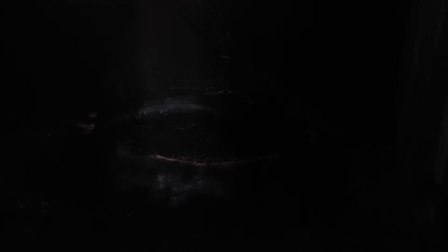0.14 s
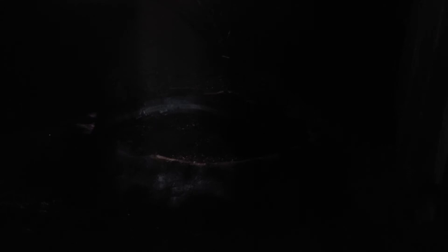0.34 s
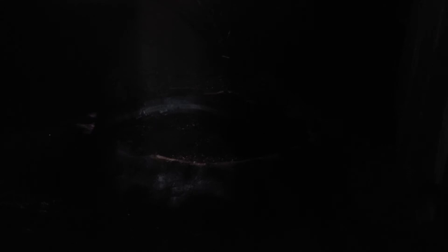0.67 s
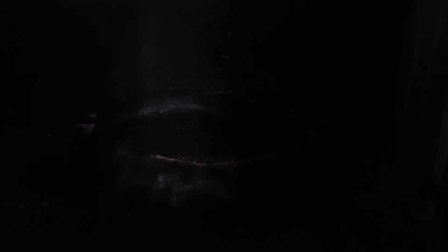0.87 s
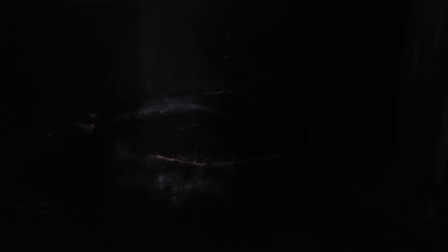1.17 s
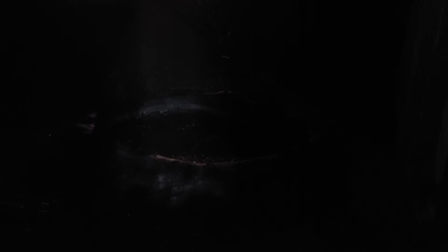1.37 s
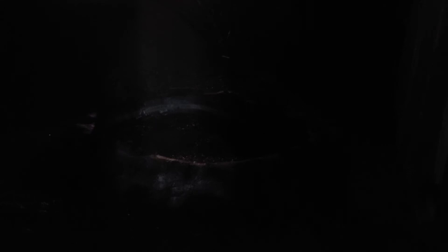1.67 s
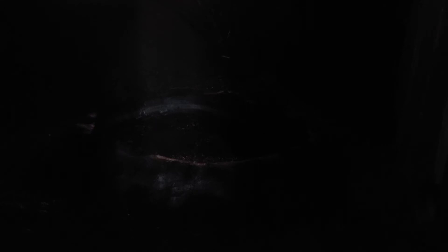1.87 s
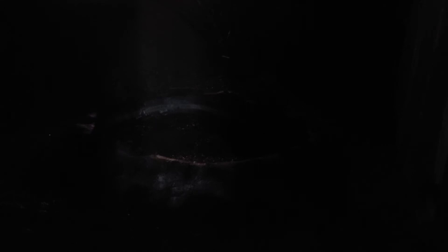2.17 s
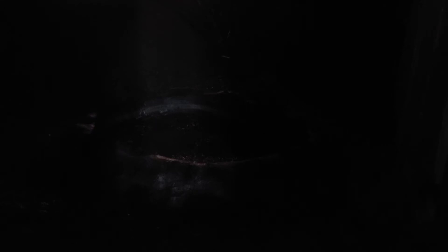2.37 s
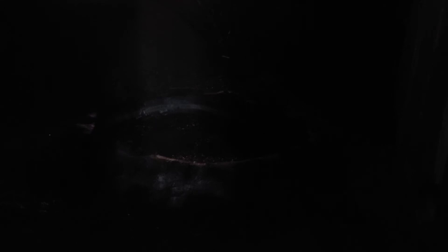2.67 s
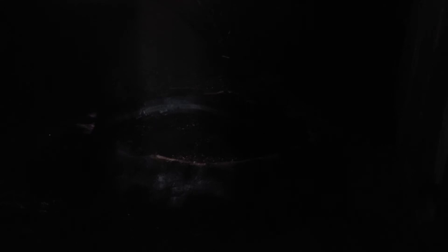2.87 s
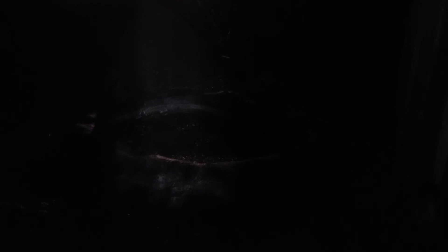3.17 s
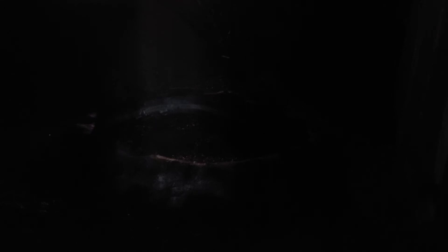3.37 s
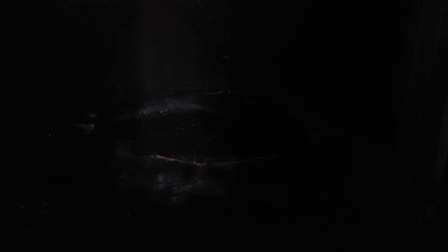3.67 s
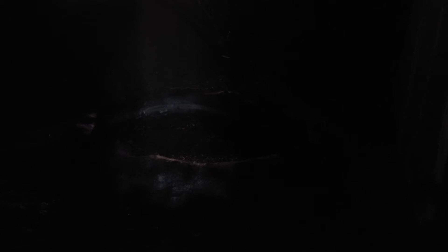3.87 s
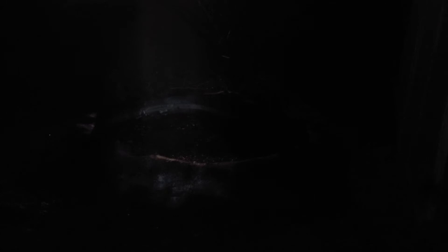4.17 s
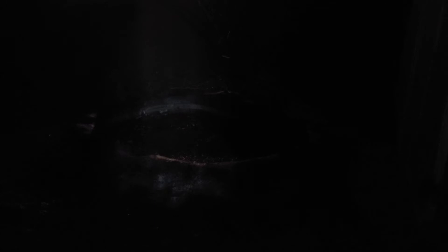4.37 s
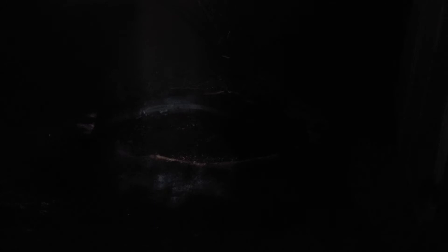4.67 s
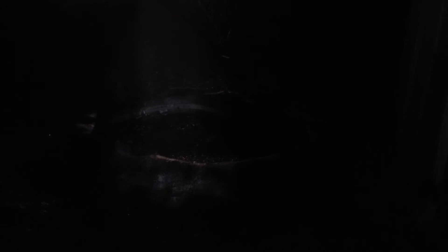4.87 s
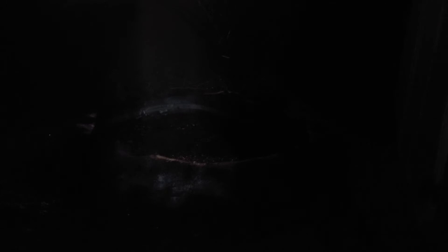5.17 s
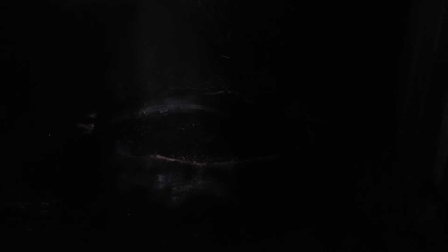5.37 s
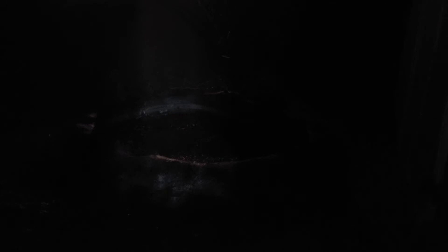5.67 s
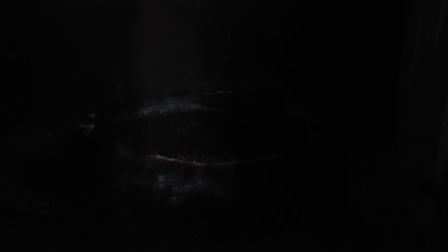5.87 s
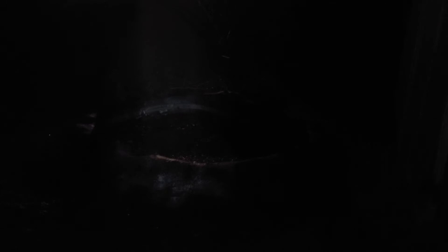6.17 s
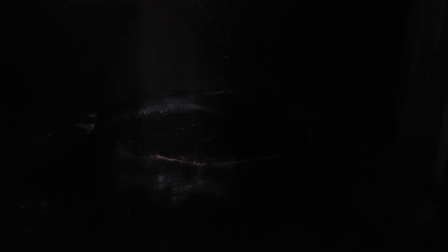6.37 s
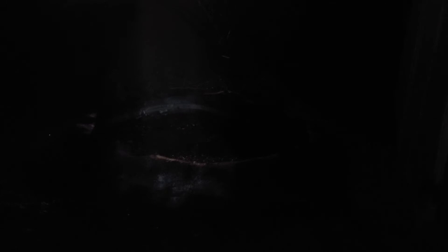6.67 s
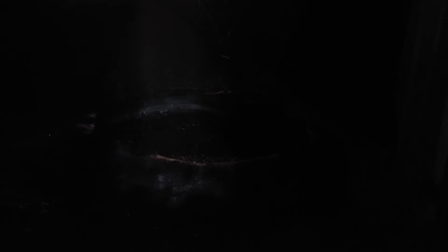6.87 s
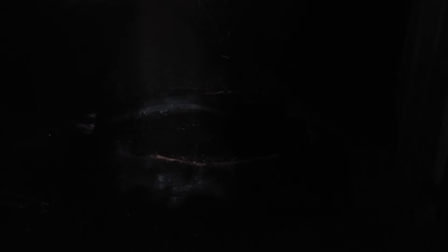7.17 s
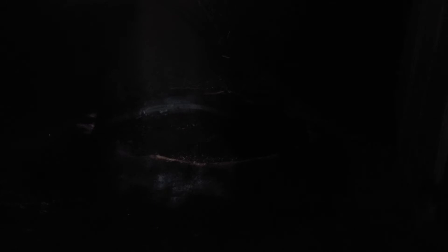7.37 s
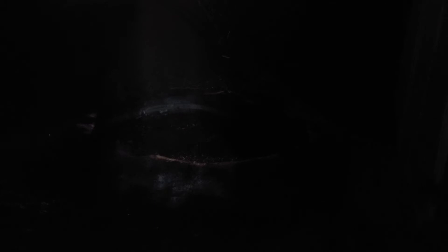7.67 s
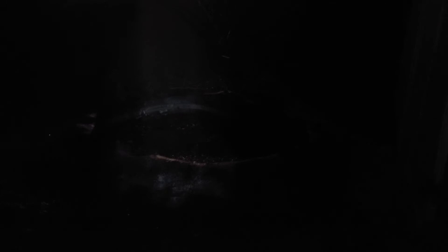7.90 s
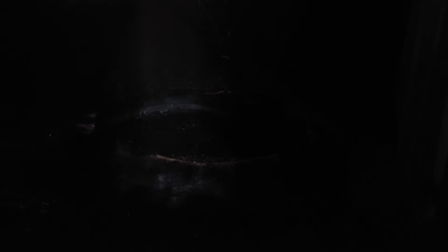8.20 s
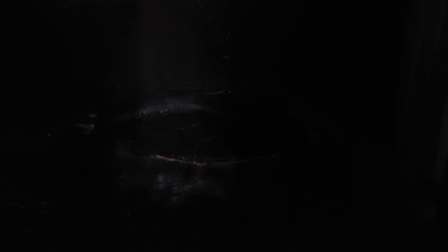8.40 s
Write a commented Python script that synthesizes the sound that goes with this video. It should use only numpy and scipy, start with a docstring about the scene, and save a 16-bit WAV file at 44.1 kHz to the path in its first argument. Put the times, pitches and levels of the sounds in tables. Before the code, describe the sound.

Quick bursts of low, almost pure frog croaks come seconds apart, between them only soft rain hiss, leaf drips and a faint low hum.

```python
"""Frog calling at night, close by

A close frog calls in short runs of arched, nearly pure notes, with thin squeaks leading in: gliding partials plus air.
A steady hiss, as of fine rain, is coloured noise with a hump near 1 kHz; a low sine hum wavers underneath.
Drops tick and spatter on leaves (short rings, then noise) over a faint patter of smeared clicks.
Soft thuds are dull noise bursts now and then; a few thin snaps are very short bright ones.
"""
import sys
import numpy as np
from scipy import signal
from scipy.fft import rfft, irfft
from scipy.io import wavfile

SR = 44100
rng = np.random.default_rng(int(sys.argv[2]) if len(sys.argv) > 2 else 0)


def to_wav(sig):
    """Store sig (one row per channel, or 1-D mono) as 16-bit WAV at the path in sys.argv[1].

    Samples outside -1..1 are clipped; the rate is SR.
    """
    pcm = np.clip(np.atleast_2d(sig), -1, 1) * 32767
    pcm = np.round(pcm).astype(np.int16)
    wavfile.write(sys.argv[1], SR, pcm.T)  # frames by channels


N = 376613

# frog notes: start_s, length_s, opening_hz, held_hz, closing_hz (both ends glide; all sag), glide_in_s, glide_out_s,
# first_db, second_db, third_db, fourth_db, upper_db (partial levels before swings and flutter),
# throat_hz (upper resonance), first_peak_at, second_peak_at, rest_peak_at (share of length, 0-1),
# pointedness (power of the swell), skirt_db (throat skirt), sag_per_s (share of pitch lost per s)
FROG_NOTES = [ (0.0, 0.1, 1124, 599, 594, 0.074, 0.018, -38, -42.5, -63, -82, -78, 3600, 0, 0.45, 0.3, 1.83, -15, .05),
              (3.048, 0.12, 1225, 797, 1020, 0.057, 0.066, -43.5, -58, -80, -77, -88, 3400, 0.55, .45, 0.3, 2.2, -15, .05),
              (3.184, 0.076, 517, 595, 524, 0.042, 0.047, -43, -37, -50.5, -62, -62, 3250, 0.99, 0.95, 0.65, 0.84, 0, 0.2),
              (3.3, 0.099, 529, 586.7, 500, 0.027, 0.042, -36.5, -24, -44, -57, -64, 3750, 0.74, 0.49, 0.5, 1.13, -16, 0.29),
              (3.438, 0.091, 536, 594, 502, 0.048, 0.035, -36, -21, -45, -53.5, -56, 3980, 0.73, 0.55, 0.13, 1.7, -17, 0.39),
              (3.566, 0.11, 564, 610.4, 522, .025, 0.054, -34.5, -21.5, -44, -51.5, -54.5, 3940, 0.47, 0.41, 0.19, 1.16, 4.5, 0.38),
              (3.686, 0.13, 540, 624.4, 513, .035, 0.036, -36.5, -29, -43, -50.5, -53, 3460, 0.66, 0.46, 0.37, 0.7, -13, 0.45),
              (5.509, 0.048, 486, 579, 480, .024, 0.025, -66, -45, -58, -63, -62.5, 3830, 0.96, 1, 1, 0.37, -5, .1),
              (5.614, 0.089, 532, 636.6, 464, 0.0198, 0.0343, -38.5, -32.5, -44.5, -66, -54, 3720, 0.62, 0.5, 0.09, 0.74, -3, 0.23),
              (5.748, 0.1, 555, 686, 531, 0.024, 0.054, -35, -29.5, -40.5, -53.5, -55, 4670, 0.58, 0.38, 0.11, 1.38, -16, 0.76),
              (5.827, 0.036, 450, 431, 410, 0.012, .015, -73, -41.5, -43, -60.5, -71, 4000, .5, 0.4, 0.6, 1.3, -20, .1),
              (5.868, 0.027, 470, 464, 470, .01, .015, -72, -32.5, -55, -58, -59, 3980, .5, 0.8, 1, 0.88, -22, .1),
              (5.891, 0.093, 510, 675, 470, 0.0263, 0.039, -35, -29, -41, -56.5, -52, 3980, 0.61, 0.36, 0.4, 1.6, -23, 0.51),
              (5.974, 0.029, 472, 459, 414, .01, 0.015, -67, -33.5, -49, -51, -60, 3620, .5, 0.72, 0.6, 1.1, -21, .1),
              (7.494, 0.13, 849, 573, 773, 0.065, 0.0465, -47, -56, -71, -78, -90, 3500, 0.82, .6, 1, 1.14, -15, 0.037),
              (7.615, 0.11, 476, 525, 497, 0.035, 0.059, -30.5, -34.5, -40, -60, -61.5, 3120, 0.55, 0.42, 0.42, 1.47, -20, .1),
              (7.742, 0.12, 455, 542.2, 442, 0.029, 0.064, -29.5, -29, -37, -51, -49, 3760, .55, 0.26, 0.29, 1.5, -11, 0.13),
              (7.851, .135, 443.4, 605.5, 470, 0.058, .05, -27.5, -23.5, -38, -44.5, -42.5, 3340, 0.67, 0.72, 0.51, 2, -30, 0.62),
              (7.969, 0.15, 460, 644, 490, 0.061, 0.031, -33, -26.5, -50, -48, -42, 3080, 0.73, 0.67, 0.37, 1, -18, 0.512),
              ]
# brief dips and pops, one list each for first, second, third, fourth and upper partials:
# centre_s (scene time), change_db, half_width_s
PARTIAL_SWINGS = [
    [(.018, -10.5, 0.009), (.066, 28.5, 0.0068), (7.61, 3, 0.0089), (7.565, 7, .015), (.05, 15, 0.0079),
     (.058, -15, 0.00085), (3.055, 21, 0.0095), (3.15, -6, 0.018), (3.228, -21, 0.0028), (7.51, 8, 0.0063),
     (3.335, -13.5, 0.021), (3.48, -23, .012), (3.62, -8.5, 0.0081), (3.652, 16.5, 0.0048),
     (3.805, 6, .006), (7.955, -7, 0.012), (7.972, 22.5, .006), (8.08, -12, 0.011), (8.093, 9.5, 0.014)],
    [(.022, 6, 0.0033), (5.909, -2, 0.0044), (5.512, 8.5, 0.0039), (.033, -15, 0.0025), (.008, -19, 0.0098),
     (.068, -15, 0.012), (3.225, -26, 0.0019), (3.236, 9.5, 0.0047), (3.385, -8, 0.0098),
     (3.512, -10, 0.006), (3.58, 7, 0.0028), (3.768, 5.5, 0.016), (7.61, 16, .012), (7.86, 11.5, .01),
     (7.99, -4, 0.0077), (3.594, -13, 0.017), (3.645, -4, 0.0055), (3.652, 2.5, 0.0017),
     (3.71, 11.5, 0.0023), (3.724, -11.5, 0.011), (3.79, -18, 0.0059), (3.8, 10.5, 0.003),
     (5.808, -12, .006), (5.96, -14, 0.015), (5.972, 28, .006), (7.672, -17, 0.005), (7.73, 23, 0.015),
     (7.782, -14.5, 0.021), (7.89, 3, 0.0033), (7.903, -9, .008), (7.935, 5, 0.0069), (7.952, -28, 0.011),
     (7.963, 3.5, 0.0033), (8.075, -9, 0.0088), (8.089, 5.5, 0.0028), (8.098, 12, 0.0016)],
    [(3.62, 0, .012), (3.8, 3, 0.003), (5.656, -2, 0.0065), (5.825, 6.5, .012), (5.935, -27, 0.0068),
     (7.648, -14, .006), (7.684, -12, 0.0042), (7.79, -8, 0.0061), (7.845, 2, 0.0097), (7.948, -7, 0.013),
     (7.862, 9, 0.011), (7.905, 5, 0.01), (7.97, 9, 0.015), (7.988, 9.5, 0.0072), (8.042, -9, .012),
     (8.085, 14, 0.014)],
    [(3.595, 4, .01), (3.775, 11, 0.025), (5.776, 10.5, 0.0083), (7.66, 5, 0.0088), (7.8, 7.5, 0.01),
     (7.89, 7, .008)],
    [(3.48, 6, 0.0091), (3.572, 13, 0.011), (3.65, 16, 0.0055), (3.695, 9, 0.011), (3.722, 12, 0.017),
     (5.65, 9, 0.0034), (5.905, 3, 0.0088), (7.665, 13, 0.004), (7.985, -3, .012), (8.032, -10, 0.004),
     (8.056, -12, .005), (8.07, 6, 0.0053)],
]
# pointedness of the swell and of the fade, one power each for the same five voice parts
RISE_POWERS = [1.22, 0.99, 0.62, 0.8, 1]
FALL_POWERS = [3.54, 1.26, 0.55, 1.8, 1.1]
# noise bands that rise with the call, bright hiss, throaty and dull air: low_hz, high_hz (band() limits the edges)
BREATH_BANDS = [(4500, 22000), (2560, 3780), (423, 2420)]
# colour of the steady hiss, a hump near 1 kHz and a steep drop near 7 kHz: frequency_hz, relative_db
HISS_COLOUR = [(30, -43), (55, -1.5), (120, -5), (250, -14.5), (600, -16), (800, -9.5), (1050, -7.5),
               (1500, -13), (2000, -15), (4850, -20), (6700, -25.5), (7200, -35.5), (11500, -39),
               (15800, -39)]
# drops on leaves: start_s, level_db, spatter_hz (centre), spatter_t60_s, spatter_db (re level_db), tick_hz
LEAF_DROPS = [(0.3192, -56, 4100, 0.13, -2, 2920), (0.637, -48, 5230, 0.054, -12, 5040),
              (0.627, -40.5, 4970, 0.22, -17.5, 4840), (0.987, -48.5, 4700, 0.088, -11, 1440),
              (0.9967, -43, 5930, 0.1, -15, 5870), (1.268, -54, 6300, 0.053, -2, 1570),
              (1.308, -55, 5910, 0.17, -10, 2010), (1.8422, -52, 4180, 0.11, -21, 1990),
              (2.2094, -65, 4020, 0.11, -12, 1520), (2.366, -49, 4180, 0.16, -15, 1870),
              (2.4684, -53, 5670, 0.47, -11, 1550), (2.6288, -43.5, 3820, 0.091, -16, 3800),
              (2.853, -49.5, 3900, 0.085, -16, 1850), (2.9401, -47, 3850, 0.14, -22, 1600),
              (3.0695, -58, 4000, 0.34, -8, 1670), (3.391, -37, 5180, 0.21, -5, 5300),
              (4.409, -56, 5280, 0.19, -5, 1890), (4.5193, -51, 3960, 0.13, -10.5, 2020),
              (4.9386, -49, 3630, 0.21, -3.5, 2740), (6.2234, -41, 5470, 0.27, -12.5, 5900),
              (6.3865, -57, 3550, 0.13, -2, 3540), (6.8127, -54, 4670, 0.13, -10, 1660),
              (7.0185, -51, 5700, 0.11, -15, 5630), (7.3926, -42.5, 3330, 0.12, -12, 2400),
              (7.6046, -43, 4200, 0.69, -18.5, 1400), (8.2506, -34, 5140, 0.17, -18.5, 4970)]
# soft thuds: start_s, level_db (before a trim), t60_s (of the low part)
SOFT_THUDS = [(0.612, -63, 0.27), (1.122, -54.5, 0.42), (2.367, -46.5, 0.57), (4.939, -55.5, 0.48),
              (7.65, -50, 1)]
# thin bright snaps, as of small twigs: start_s, level_db (noise rms before decay), t60_s
TWIG_SNAPS = [(.9872, -53, .004), (3.3005, -57, .006), (3.308, -49.5, 0.027), (7.389, -57, 0.06)]

GLIDE_IN_POWER, GLIDE_OUT_POWER = 2.1, 1.744   # how sharply the glides curve into the held pitch
THROAT_WIDTH_HZ = 350
BREAK_DB = -18   # dull rasp that joins in while the pitch slides fast
POOL_T60_S, POOL_DB = .2, -17
HISS_DB = -58
HUM_HZ, HUM_DB = 59.4, -62
SPATTER_OCTAVES = 0.59   # either side of the centre
TICK_RISE_S = 0.00035
THUD_TOP_HZ = 265
CUTOFF_HZ = 15780


def amp(db):
    """Decibels to gain."""
    return 10 ** (np.asarray(db) / 20)


def rms_one(x):
    """Scales to unit rms."""
    return x / np.sqrt(np.mean(x ** 2) + 1e-20)


def band(x, low_hz, high_hz):
    """Band-pass, with edges held between 20 Hz and 0.45 of the sample rate."""
    edges = np.clip([low_hz, high_hz], 20, .45 * SR)
    return signal.sosfilt(signal.butter(2, edges, "band", fs=SR, output="sos"), x)


def drift(rate_hz, size=N):
    """Smooth random wander of unit rms, changing about rate_hz times a second."""
    r = np.exp(-2 * np.pi * rate_hz / SR)
    run_in = SR // 2
    noise = rng.standard_normal(size + run_in)
    return rms_one(signal.lfilter([1], [1, -2 * r, r * r], noise)[run_in:])


def add(out, start_s, sound):
    """Mixes a sound in at a time."""
    at = max(round(start_s * SR), 0)
    out[at:at + len(sound)] += sound[:N - at]


def swell(u, peak_at, rise, fall):
    """From nothing up to 1 at the peak and back, over u = 0..1."""
    peak_at = np.clip(peak_at, .005, .95)
    up = np.clip(u / peak_at, 0, 1)
    down = np.clip((1 - u) / (1 - peak_at), 0, 1)
    return np.sin(np.pi / 2 * up) ** rise * np.sin(np.pi / 2 * down) ** fall


def swing(time_s, rows):
    """Gain of the brief dips and pops of one voice part, each a bell curve in dB."""
    return amp(sum(db * np.exp(-((time_s - centre) / width) ** 2) for centre, db, width in rows))


def throat(high_hz, throat_hz, skirt_db):
    """Shares the upper level among partials: a resonance peak on a falling skirt, at constant total power."""
    share = amp(skirt_db) * 2300 / high_hz + 1 / (1 + (2 * (high_hz - throat_hz) / THROAT_WIDTH_HZ) ** 2)
    share = share / (1 + (high_hz / 4400) ** 16)
    return share / np.sqrt(np.sum(share ** 2, axis=0))


def note(row, waver, rasp, flutter, breath):
    """Partials on an arched pitch; the cords lose their steadiness while the pitch slides fast."""
    (start, length, opening_hz, held_hz, closing_hz, glide_in, glide_out, *levels_db,
     throat_hz, first_at, second_at, rest_at, pointed, skirt_db, sag) = row
    t = np.arange(0, length, 1 / SR)
    size = len(t)
    going_in = np.maximum(1 - t / glide_in, 0) ** GLIDE_IN_POWER
    going_out = np.maximum(1 - (length - t) / glide_out, 0) ** GLIDE_OUT_POWER
    glides = (opening_hz / held_hz) ** going_in * (closing_hz / held_hz) ** going_out
    pitch = held_hz * glides * (1 - sag * t)
    phase = 2 * np.pi * np.cumsum(pitch * (1 + 0.0039 * waver[:size])) / SR

    peaks_at = [first_at, second_at] + 3 * [rest_at]
    parts = [amp(db) * swell(t / length, *shape) ** pointed
             for db, *shape in zip(levels_db, peaks_at, RISE_POWERS, FALL_POWERS)]
    *lowest, upper = [part * swing(start + t, rows) for part, rows in zip(parts, PARTIAL_SWINGS)]

    slide = np.abs(np.gradient(np.log(pitch))) * SR
    steady = 1 / (1 + (slide / 6) ** 2)
    k = np.arange(1, 10)[:, None]   # partial numbers
    rough = np.clip((.03 + .02 * slide) * k ** .5, 0, .9)
    # partials 5-9 stand out near the upper throat resonance and turn to hiss in fast slides
    share = throat(k[4:] * pitch, throat_hz, skirt_db) * steady
    # each partial wavers in level at random, the high ones most
    gains = np.vstack([*lowest, upper * share]) * amp(.55 * k * flutter[:, :size])
    tones = np.sqrt(2) * np.sin(k * phase)
    partials = tones * (np.sqrt(1 - rough ** 2) + rough * rasp[:, :size])

    bright, throaty, dull = breath[:, :size]
    loudness = np.sqrt(np.sum(gains ** 2, axis=0))
    dull_gain = amp(-25) + amp(BREAK_DB) * (1 - steady)
    air = loudness * (amp(-53.5) * bright + dull_gain * dull)
    air = air + 1.9 * upper * (1 - steady) * throaty
    return np.sum(gains * partials, axis=0) + air


def pool_scatter(call):
    """Short scatter off the banks of the pool: decaying band-passed noise after a 12 ms gap."""
    t = np.arange(SR // 2) / SR
    scatter = rng.standard_normal(len(t)) * amp(-60 * t / POOL_T60_S) * (t > .012)
    scatter = band(scatter, 300, 3500)
    # unit mean power gain over 300-3000 Hz (bins are 2 Hz apart)
    scatter = scatter / np.sqrt(np.mean(np.abs(rfft(scatter)[150:1500]) ** 2))
    return amp(POOL_DB) * signal.fftconvolve(call, scatter)[:N]


def frog():
    """All notes, each with its own breath and unsteadiness, plus their scatter off the banks."""
    call, size = np.zeros(N), SR // 5
    for row in FROG_NOTES:
        breath = np.array([rms_one(band(rng.standard_normal(size), *edges)) for edges in BREATH_BANDS])
        rasp = drift(150, size=9 * size).reshape(9, size)
        flutter = drift(22, size=9 * size).reshape(9, size)
        waver = drift(73, size=size)
        add(call, row[0], note(row, waver, rasp, flutter, breath))
    return call + pool_scatter(call)


def hiss(patchy_db):
    """Coloured noise in octave bands, each flickering a little, partly together."""
    hz = np.maximum(np.fft.rfftfreq(N, 1 / SR), 1)
    points = np.array(HISS_COLOUR)
    colour_db = np.interp(np.log(hz), np.log(points[:, 0]), points[:, 1])
    spectrum = rfft(rng.standard_normal(N)) * amp(colour_db)
    together, out = drift(4.0), 0
    for octave in range(5, 15):   # centres at 2 ** octave Hz, crossfading into each other
        part = np.cos(np.pi / 2 * np.clip(np.log2(hz) - octave, -1, 1)) ** 2
        flicker = amp(patchy_db * (.9 * together + drift(5.0)))
        out = out + irfft(spectrum * part, N) * flicker
    return amp(HISS_DB) * rms_one(out)


def hum():
    """A low sine tone that wavers in level and pitch."""
    phase = 2 * np.pi * np.cumsum(HUM_HZ + 1.513 * drift(3.46)) / SR
    return amp(HUM_DB + 1.0 * drift(1.6)) * np.sin(phase)


def patter():
    """Faint far drops at random, about 5 a second: uneven clicks smeared into soft-edged noise."""
    sizes = amp(3.5 * np.minimum(rng.exponential(1, N), 3)) * rng.choice([-1, 1], N)
    clicks = sizes * (rng.random(N) < 5 / SR)
    t = np.arange(SR // 10) / SR
    smear = rng.standard_normal(len(t)) * amp(-60 * t / .15) * np.minimum(t / .006, 1)
    smeared = signal.fftconvolve(clicks, smear)[:N]
    return amp(-72) * band(band(smeared, 4500, 9500), 3000, 10000)


def drops():
    """A sharp tick rings a few cycles, then a spatter of fine droplets dies away."""
    out, t = np.zeros(N), np.arange(SR // 3) / SR
    ratio = 2 ** SPATTER_OCTAVES
    for start, db, hz, t60, spatter_db, tick_hz in LEAF_DROPS:
        noise = band(rng.standard_normal(len(t)), hz / ratio, hz * ratio)
        noise = rms_one(band(noise, 1200, 8500))
        # two rings, each 60 dB down after 22.4 cycles
        tick = sum(1.65 * np.sin(2 * np.pi * f * t) * amp(-60 * t * f / 22.4) for f in (tick_hz, hz * 0.88))
        tick = tick * np.minimum(t / TICK_RISE_S, 1)
        spatter = amp(spatter_db) * noise * amp(-60 * t / t60) * np.minimum(t / 0.0033, 1)
        add(out, start - .0005, amp(db) * (tick + spatter))
    return out


def thuds():
    """Dull noise bursts that lose their top first."""
    out, t = np.zeros(N), np.arange(SR // 2) / SR
    for start, db, t60 in SOFT_THUDS:
        white = rng.standard_normal((2, len(t)))
        low = rms_one(band(white[0], 66, THUD_TOP_HZ)) * amp(-60 * t / t60)
        high = rms_one(band(white[1], THUD_TOP_HZ * 1.7, THUD_TOP_HZ * 4.2))
        high = amp(9.5) * high * amp(-60 * t / (0.31 * t60))
        soft_edge = np.minimum(t / 0.0086, 1)
        add(out, start - .002, amp(db - 4.5) * (low + high) * soft_edge)
    return out


def snaps():
    """Very short bursts of bright noise."""
    out, t = np.zeros(N), np.arange(SR // 20) / SR
    for start, db, t60 in TWIG_SNAPS:
        noise = rms_one(band(rng.standard_normal(len(t)), 3500, 18000))
        add(out, start, amp(db - 60 * t / t60) * noise)
    return out


def scene():
    """Everything at the pool, one channel."""
    background = hiss(patchy_db=-0.14) + hum() + patter()
    return (frog() + background + drops() + thuds() + snaps())[None, :]


def record(dry):
    """The top is cut by a steep low-pass."""
    return signal.sosfilt(signal.ellip(12, .5, 50, CUTOFF_HZ, fs=SR, output="sos"), dry)


dry = scene()
out = record(dry)
to_wav(out)
```